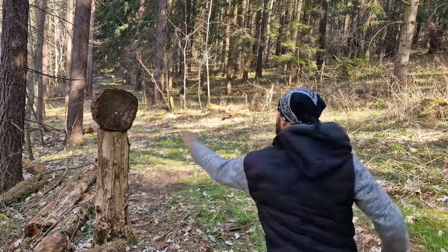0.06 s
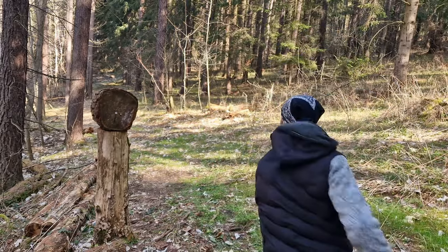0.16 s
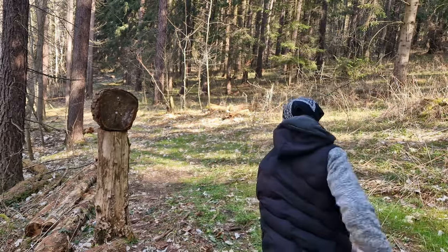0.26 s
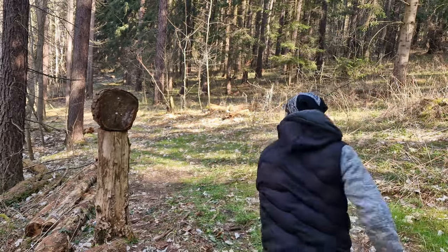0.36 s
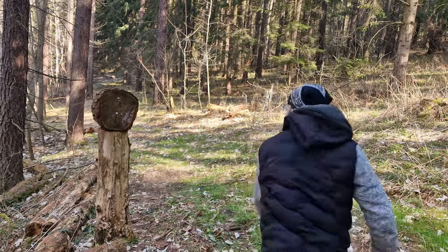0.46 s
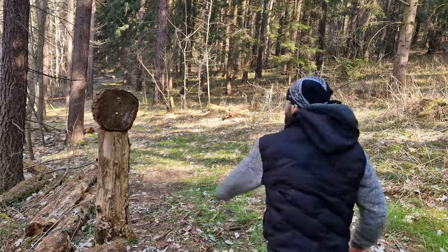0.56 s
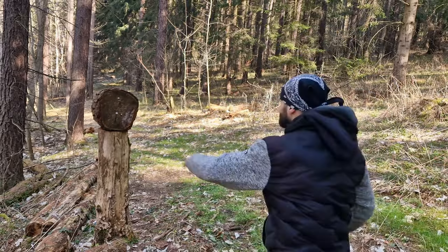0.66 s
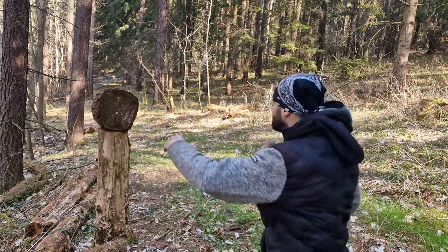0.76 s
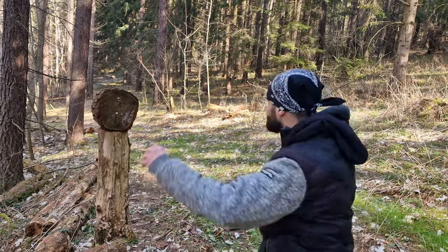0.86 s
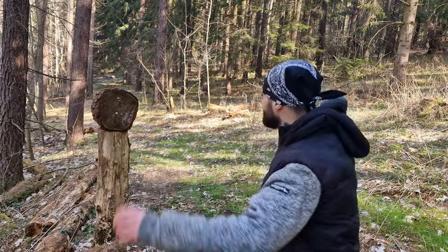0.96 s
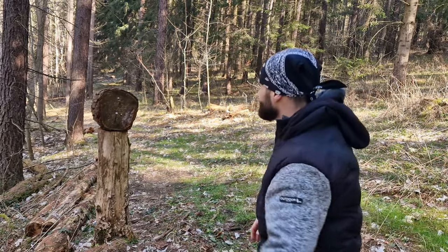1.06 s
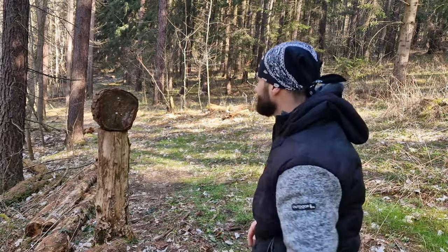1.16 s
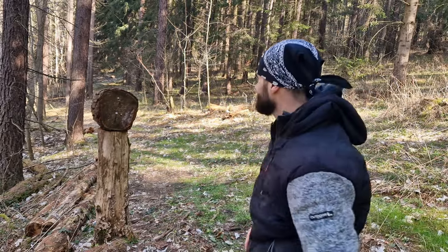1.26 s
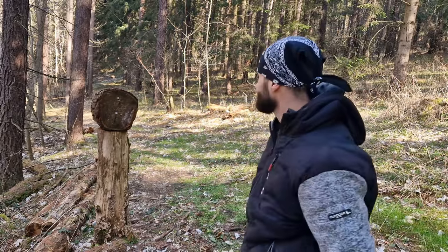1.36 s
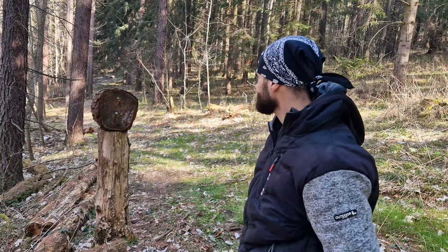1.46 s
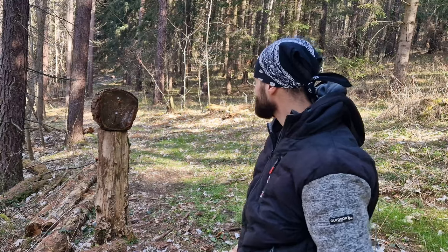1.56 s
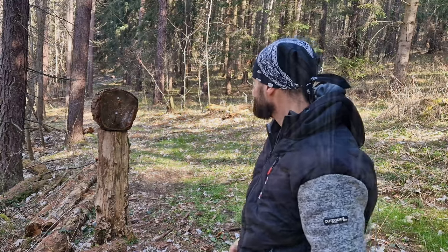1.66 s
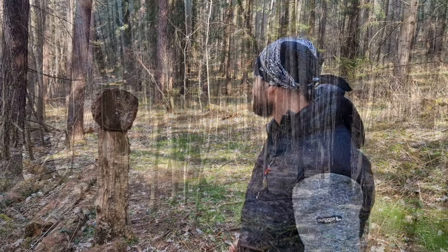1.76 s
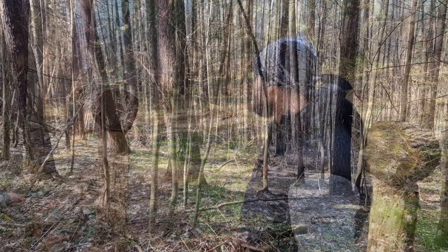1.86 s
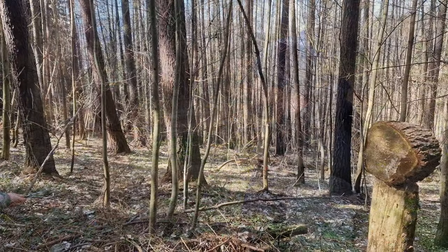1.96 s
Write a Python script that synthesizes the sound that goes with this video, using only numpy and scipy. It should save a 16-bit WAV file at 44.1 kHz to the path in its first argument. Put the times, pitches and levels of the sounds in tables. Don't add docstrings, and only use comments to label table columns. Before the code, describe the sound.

Padded sleeve swishes close by, then one hard, dry nail hit thuds into wood and quivers briefly; nylon rubs and ticks follow over quiet wind rumble, leaf hiss and distant bird whistles, wide stereo microphone.

```python
import sys
import numpy as np
from scipy import signal
from scipy.fft import rfft, irfft, next_fast_len
from scipy.io import wavfile
from scipy.ndimage import uniform_filter1d, map_coordinates

SR = 44100
rng = np.random.default_rng(int(sys.argv[2]) if len(sys.argv) > 2 else 0)


def unload_wav(signal):
    wavfile.write(
        sys.argv[1],
        SR,
        np.round(np.clip(np.atleast_2d(signal).T, -1, 1) * 32767).astype(np.int16),
    )


def nominal_scale(level):
    x = np.asarray(level, float) / 20
    return 10 ** x


N = 88200
TIME_S = np.arange(N) / SR
SIDE = np.array([[.5], [-.5]])


def unit(x):
    return x / np.sqrt(np.mean(x ** 2) + 1e-20)


def along(points, hz):
    f, v = np.transpose(points)
    return np.interp(np.log(hz + 1), np.log(f + 1), v)


def wobble(rate):
    knots = rng.standard_normal(int(N * rate / SR) + 4)
    return map_coordinates(knots, [TIME_S * rate])


def filtered(x, response):
    m = next_fast_len(N + SR // 2)
    return irfft(rfft(x, m) * response(np.fft.rfftfreq(m, 1 / SR)), m)[..., :N]


def body(peaks):
    def response(f):
        total = 0
        for k, (hz, width, db) in enumerate(peaks):
            total = total + (-1) ** k * nominal_scale(db) * 1j * f * width / (hz * hz - f * f + 1j * f * width)
        return total
    return response


def placed(x, lag_s, pan_db):
    def ears(f):
        delay = np.exp(2j * np.pi * f * lag_s * SIDE)
        treble = f * f / (f * f + 3500 ** 2)
        return delay * nominal_scale(pan_db * SIDE * treble * 1.3)
    return filtered(x, ears)


# (frequency [Hz], likeness [0 to 1])
LIKENESS = [(100, 0.98), (500, 0.56), (1200, 0.37), (2500, 0.31), (10000, 0.042)]


def rush(spectrum, patchy_db):
    z = signal.stft(rng.standard_normal((2, N)), nperseg=256)[2]
    field = uniform_filter1d(rng.standard_normal(z.shape[1:]), size=6, axis=0)
    field = uniform_filter1d(field, size=10, axis=1)
    pair = signal.istft(z * nominal_scale(patchy_db * unit(field)), nperseg=256)[1][:, :N]

    def mid_and_side(hz):
        turn = np.arccos(np.clip(along(LIKENESS, hz), -1, 1)) / 2
        return nominal_scale(along(spectrum, hz)) * [np.cos(turn), np.sin(turn)]
    mid, side = filtered(pair, mid_and_side)
    return unit(np.array([mid + side, mid - side]))


# (time [s], strength [dB])
GUSTS = [(0.0, -55), (.1, -57), (.26, -60), (.4, -59), (.57, -58), (.66, -61), (.77, -55), (.85, -59.5),
         (.94, -57), (1.05, -58), (1.25, -56), (1.38, -57), (1.54, -62), (1.69, -52), (1.8, -58),
         (1.89, -54), (2.0, -56)]
# (frequency [Hz], level per Hz [dB])
RUMBLE_COLOUR = [(11, -52.5), (18, -6), (38, -0.5), (81, 4), (98, -3.5), (125, -15.5), (151, -19),
                 (200, -22), (260, -52), (440, -120)]
# (frequency [Hz], level per Hz [dB])
LEAF_COLOUR = [(76, -14), (130, 0.5), (159, -14), (356, -0.5), (935, -15.5), (1430, -19), (3910, -27),
               (6470, -30.5), (16000, -63.5)]
LEAVES_DB = -65


def wind():
    s, strength_db = np.transpose(GUSTS)
    rumble = unit(nominal_scale(.7 * wobble(11.0)) * rush(RUMBLE_COLOUR, patchy_db=1))
    rumble *= nominal_scale(np.interp(TIME_S, s, strength_db) + 1.5)
    leaves = nominal_scale(LEAVES_DB + 1.5 * wobble(5.63)) * rush(LEAF_COLOUR, patchy_db=1.04)
    return rumble + leaves


CRACKLE_PER_S, CRACKLE_DB, CRACKLE_HZ = 300, -0.5, 5000


def cloth(sharp, dull, spectrum, grain_db, pan_db):
    noise = rush(spectrum, patchy_db=-1.0)
    low = filtered(noise, lambda f: 1 / (1 + (f / 3000) ** 2))
    chance, sign, size = rng.random((3, N))
    sparks = (chance < CRACKLE_PER_S / SR) * np.sign(sign - .5) * nominal_scale(CRACKLE_DB - 4 * np.log(size + .05))
    crackle = filtered(sparks, body([(CRACKLE_HZ, CRACKLE_HZ, 0)]))
    crackle = placed(crackle, lag_s=.00004, pan_db=3.0)
    mix = (noise - low + crackle) * sharp + low * dull
    return mix * nominal_scale(grain_db * wobble(200) + .6 * wobble(40) + pan_db * SIDE)


# (time [s], level [dB], brightness [dB])
ARM_SWISH = [
    (0, -41.5, 2),
    (.03, -43.5, 1.5),
    (.075, -45.5, 2.5),
    (.12, -50.5, 1),
    (.17, -54.5, -0.5),
    (0.302, -59, 0.5),
]
# (frequency [Hz], level per Hz [dB])
SLEEVE_COLOUR = [(76, -44.5), (130, 1.5), (356, -4), (418, 5), (491, -9.5), (577, -2), (6870, -15),
                 (14800, -15.5), (16000, -41.5)]


def swish():
    s, level_db, bright_db = np.transpose(ARM_SWISH)
    level = nominal_scale(np.interp(TIME_S, [*s, s[-1] + .2], [*level_db, -110]))
    dull = level * nominal_scale(-np.interp(TIME_S, s, bright_db))
    return cloth(level, dull, SLEEVE_COLOUR, grain_db=1.5, pan_db=0.9)


# (time [s], peak level [dB], pitch [Hz])
FOLDS = [(.0135, -41.5, 800), (.0185, -39, 900), (.022, -35.5, 450), (.037, -42, 700), (.055, -39, 550),
         (.072, -40, 900), (.134, -40, 750), (.157, -46, 680), (0.321, -36.5, 1260), (0.362, -46.5, 790),
         (.425, -43.5, 1400), (.46, -54, 1100), (.629, -46.5, 1290), (.641, -49, 900), (.87, -46, 900),
         (.919, -54, 900), (1.155, -51, 1200), (1.243, -51.5, 1000), (1.313, -54, 1100), (1.185, -47, 700),
         (1.188, -45.5, 500), (1.2705, -48, 700), (1.2876, -45, 800), (1.2936, -37, 760),
         (1.2993, -52, 900), (1.335, -54, 900), (1.7885, -46, 750), (1.795, -52, 450)]
PUFF_DB, PUFF_S = -14, 0.011
SWING = 1.7


def pops():
    pulses, puff_level = 0, 0
    for at, db, hz in FOLDS:
        phase2 = (np.pi * hz * (TIME_S - at)) ** 2
        pulses = pulses - nominal_scale(db) * (1 - SWING * phase2) * np.exp(-phase2)
        fading = nominal_scale(db + PUFF_DB - 20 * np.abs(TIME_S - at) / PUFF_S)
        puff_level = puff_level + (TIME_S > at) * fading
    air = unit(filtered(rng.standard_normal(N), lambda f: body([(800, 1100, 0)])(f) ** 2))
    return placed(pulses + air * puff_level, lag_s=-.0001, pan_db=1.1)


# (time [s], peak level [dB], pitch [Hz])
SEAM_SNAPS = [(0.135, -46, 7500), (.321, -47, 2200), (0.717, -46.5, 6460), (.802, -58, 10000),
              (.819, -61, 12650), (.967, -49.5, 12800), (1.057, -61, 5460), (1.192, -52, 4500),
              (1.197, -50, 7000), (1.214, -53, 5000), (1.233, -52, 5500), (1.264, -56, 13000),
              (1.27, -54, 13500), (1.2835, -50.5, 9000), (1.297, -57, 4000), (1.334, -54, 8500),
              (1.351, -46.5, 6000), (1.362, -57, 6000), (1.423, -47.5, 11000), (1.458, -53.5, 6500),
              (1.461, -52, 9000), (1.471, -58, 4500), (1.476, -57, 6500), (1.482, -56, 5000),
              (1.487, -53, 5500), (1.492, -50, 4200), (1.4945, -56, 9000), (1.498, -59, 4000),
              (1.5075, -56, 4500), (1.513, -60, 5000), (1.524, -49, 8700)]


def snaps():
    total = 0
    for at, db, hz in SEAM_SNAPS:
        burst = unit(filtered(rng.standard_normal(N), body([(hz, 0.49 * hz, 0)])))
        fading = nominal_scale(db - 4.5 - 60 * np.abs(TIME_S - at) / 0.01)
        total = total + burst * (TIME_S > at) * fading
    return placed(total, lag_s=.00003, pan_db=3)


STRIKE_S = .18485
DRIVE_S, STOP_S = .00121, .00052
MOVING_S = DRIVE_S + STOP_S

# (centre [Hz], width [Hz], level [dB])
FIBRES = [(3000, 1500, 0), (4400, 1500, 0), (8000, 4000, -4), (14500, 4000, -20)]
TEAR_DB = -25
LEAD_DB, LEAD_S = -20, .001
SPLINTER_DB, SPLINTER_T60_S = -9, .045


def tear(t):
    splinters = nominal_scale(SPLINTER_DB - 60 * np.abs(t) / SPLINTER_T60_S)
    level = np.select([t < 0, t < MOVING_S], [nominal_scale(LEAD_DB), 1], splinters)
    sound = filtered(rng.standard_normal(N) * (t > -LEAD_S) * level, body(FIBRES))
    return sound * nominal_scale(TEAR_DB) / np.sqrt(np.sum(sound ** 2) / (MOVING_S * SR))


SLIP_DB = -30
SLIP_FROM_HZ, SLIP_TO_HZ = 7600, 3610


def slip(t):
    rate_hz = np.interp(t, [0, MOVING_S], [SLIP_FROM_HZ, SLIP_TO_HZ])
    level = np.interp(t, [0, .0002, .0006, DRIVE_S, MOVING_S], [0, 1, 0.34, 1.7, 0.00045])
    return nominal_scale(SLIP_DB) * level * np.sin(2 * np.pi * np.cumsum(rate_hz) / SR)


# (centre [Hz], width [Hz], level [dB])
LOG_MODES = [(297, 215, 0), (534, 230, -7), (850, 65, -4)]
# (centre [Hz], width [Hz], level [dB])
RIM_MODES = [(1414, 50, 12.5)]
THUD_DB = -11
SMALL_FACE_HZ = 105


def thud(t):
    force = np.interp(t, [0, DRIVE_S, MOVING_S], [0, 1, 0])

    def wood(f):
        shaking = sum(body([mode])(f) for mode in LOG_MODES) - body(RIM_MODES)(f)
        return shaking * (1j * f / (SMALL_FACE_HZ + 1j * f)) ** 2
    sound = filtered(-force, wood)
    return nominal_scale(THUD_DB) * sound / np.abs(sound).max()


# (pitch [Hz], width [Hz], peak level [dB])
END_GRAIN = [(90, 20, -33.5), (152, 60, -35), (2146, 70, -26.5), (3116, 160, -27), (4370, 190, -26.5)]


def knock(t):
    u = np.maximum(t - DRIVE_S, 0)
    total = 0
    for hz, width, db in END_GRAIN:
        total = total + nominal_scale(db) * np.exp(-np.pi * width * u) * np.sin(2 * np.pi * hz * u)
    return total


# (pitch [Hz], width [Hz], level [dB], time to fade 60 dB [s])
SHANK = [(2320, 260, -52, 0.35), (1506, 230, -43, 0.22), (900, 200, -52, 0.23)]


def quiver(t):
    total = 0
    for hz, width, db, t60 in SHANK:
        tone = unit(filtered(rng.standard_normal(N), body([(hz, width, 0)])))
        total = total + nominal_scale(db - 60 * np.abs(t) / t60) * tone
    return total * (t > DRIVE_S)


REBOUND_S, REBOUND_DB, REBOUND_HZ = .0051, -35, 7700


def rebound(t):
    pulse = np.exp(-((t - REBOUND_S) / .0005) ** 2)
    return nominal_scale(REBOUND_DB) * pulse * 2 * np.sin(2 * np.pi * REBOUND_HZ * t)


def nail():
    t = TIME_S - STRIKE_S
    return tear(t) + slip(t) + thud(t) + knock(t) + quiver(t) + rebound(t)


# (frequency [Hz], time to fade 60 dB [s])
TRUNK_FADE = [(100, 0.26), (400, 0.26), (2000, 0.74), (8000, 0.248), (15000, .15)]


def trunks(x, share, delay_s):
    noise = rush([(50, 0), (16000, 0)], patchy_db=0)[:, :SR // 2]
    hz, t, z = signal.stft(noise, SR, nperseg=128)
    fading = nominal_scale(-60 * t / (share * along(TRUNK_FADE, hz)[:, None]))
    tail = signal.istft(z * fading, SR, nperseg=128)[1]
    tail = tail / np.linalg.norm(tail[0])
    late = np.pad(x, (round(delay_s * SR), 0))
    return signal.fftconvolve(late[None], tail, axes=1)[:, :N]


NEAR_DB, NEAR_SHARE, FAR_DB = -16.5, 0.13, -19
BARK_HZ = 6000


def echo(hit):
    dull = filtered(hit, lambda f: 1 / (1 + 1j * f / BARK_HZ))
    near = nominal_scale(NEAR_DB) * trunks(dull, NEAR_SHARE, delay_s=.003)
    return near + nominal_scale(FAR_DB) * trunks(dull, 1, delay_s=0.015)


# (peak time [s], rise [s per 20 dB], fall [s per 20 dB], peak level [dB], brightness [dB])
JACKET_RUBS = [(.365, 0.07, 0.0871, -58.5, -7), (0.448, 0.042, 0.5, -79, -7), (.535, .05, 0.23, -76, -7.5),
               (0.611, 0.1, 0.2, -68, -6.5), (0.722, 0.035, 0.06, -69, -5.5), (0.808, 0.1, 0.04, -73, -6),
               (0.918, 0.12, 0.08, -63.5, -4), (0.958, 0.034, 0.2, -75, 22.5),
               (1.2, 0.063, 0.0945, -56.5, 3.5), (1.265, 0.082, 0.08, -65, -0.5),
               (1.335, 0.08, 0.18, -66, -0.5), (1.351, 0.015, 0.01, -64, 1), (1.39, 0.091, 0.23, -69, 0.5),
               (1.49, 0.05, 0.07, -70, 4.5), (1.52, 0.08, 0.015, -70, 3), (1.758, 0.074, 0.2, -72.5, -2)]
# (frequency [Hz], level per Hz [dB])
NYLON_COLOUR = [(180, -28.5), (300, -5.5), (801, -9.5), (1410, -11), (1610, -13), (2360, -18),
                (3030, -15.5), (7320, -15.5), (16000, -22)]


def rubs():
    sharp, dull = 0, 0
    for at, rise, fall, db, bright_db in JACKET_RUBS:
        away = np.where(TIME_S < at, (at - TIME_S) / rise, (TIME_S - at) / fall)
        swell = nominal_scale(db - 20 * away)
        sharp = sharp + swell
        dull = dull + swell * nominal_scale(-bright_db)
    return cloth(sharp, dull, NYLON_COLOUR, grain_db=1.25, pan_db=3.5)


# (start [s], length [s], from pitch [Hz], to pitch [Hz], level [dB])
WHISTLES = [(1.54, .045, 7300, 7350, -77), (1.59, .012, 4200, 5000, -79), (1.698, .01, 4800, 3400, -81),
            (1.713, .032, 3550, 4600, -74), (1.745, .014, 4600, 5000, -74), (1.752, .01, 4300, 3400, -78),
            (1.77, .012, 5000, 4800, -79), (1.846, .01, 4900, 3500, -75), (1.86, .028, 3300, 4900, -75),
            (1.89, .009, 3400, 4900, -74), (1.97, .018, 3600, 4800, -77), (1.83, .014, 8100, 7550, -80),
            (1.842, .016, 7550, 7350, -75), (1.857, .008, 7300, 6800, -79), (1.866, .014, 7450, 7450, -75),
            (1.883, .012, 7200, 7150, -78), (1.895, .02, 6900, 6300, -81), (1.945, .014, 7400, 7500, -81),
            (1.968, .032, 6450, 6450, -78)]
CHORUS_HZ, CHORUS_WIDE_HZ, CHORUS_DB = 7400, 700, -93


def birds():
    many = body([(CHORUS_HZ, CHORUS_WIDE_HZ, 0)])
    chorus = unit(filtered(rng.standard_normal((2, N)), lambda f: many(f) ** 2))
    chorus = nominal_scale(CHORUS_DB + 3 * wobble(10)) * chorus
    song = 0
    for s, length, from_hz, to_hz, db in WHISTLES:
        u = np.clip((TIME_S - s) / length, 0, 1)
        pitch_hz = from_hz + (to_hz - from_hz) * u
        song = song + nominal_scale(db) * np.sin(np.pi * u) ** .5 * np.sin(2 * np.pi * np.cumsum(pitch_hz) / SR)
    song = song * nominal_scale(4 + 3 * wobble(150))
    return placed(song, lag_s=.00008, pan_db=1) + nominal_scale(-13) * trunks(song, .3, delay_s=.005) + chorus


def scene():
    jacket = swish() + pops() + snaps() + rubs()
    hit = nail()
    strike = placed(hit, lag_s=0.00017, pan_db=3.5)
    return wind() + jacket + strike + echo(hit) + birds()


def low_pass(x):
    return signal.sosfilt(signal.butter(12, 16660, fs=SR, output="sos"), x)


TOP_HZ, BURST_TOP_HZ = 15850, 16660
BURST_TOP_DB, LOUD_DB = -6, -31


def record(dry):
    low = filtered(dry, lambda f: f < TOP_HZ)
    top = filtered(dry - low, lambda f: nominal_scale(BURST_TOP_DB) * (f < BURST_TOP_HZ))
    burst = uniform_filter1d(np.abs(dry).mean(axis=0), size=256) > nominal_scale(LOUD_DB)
    opening = uniform_filter1d(burst * 1., size=256)
    return low_pass(low + top * opening)


dry = scene()
out = record(dry)
unload_wav(out)
```